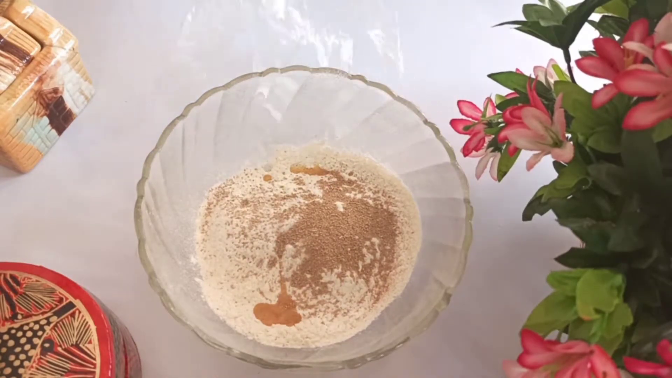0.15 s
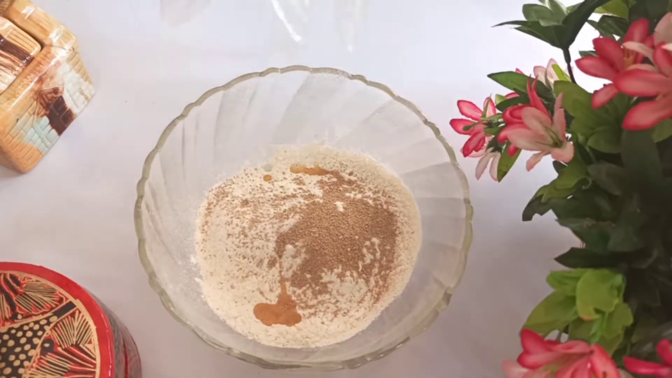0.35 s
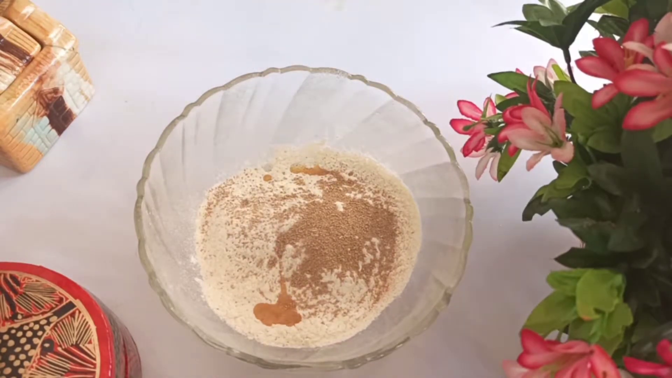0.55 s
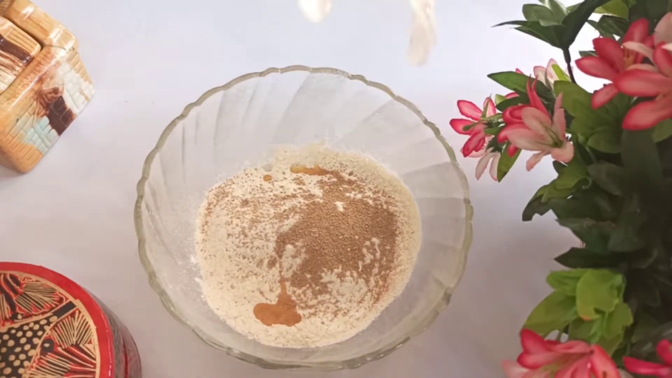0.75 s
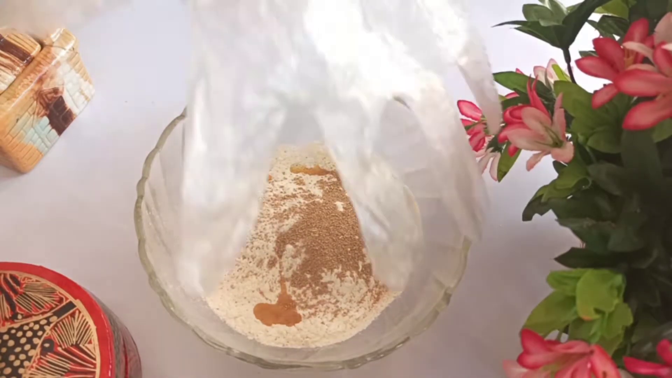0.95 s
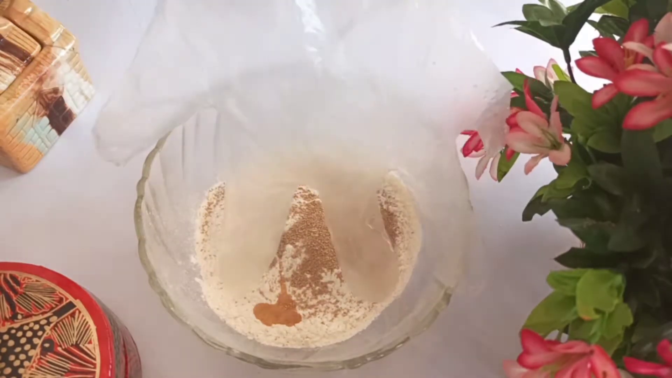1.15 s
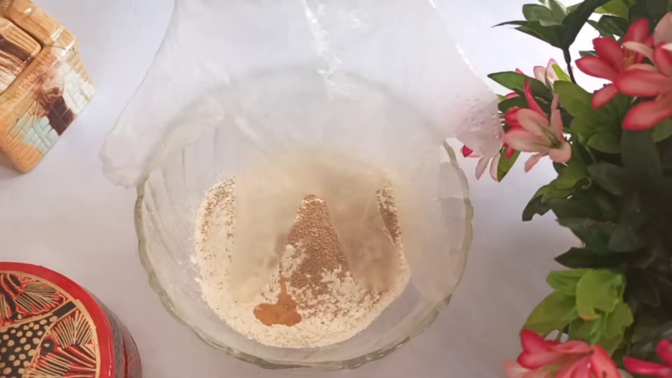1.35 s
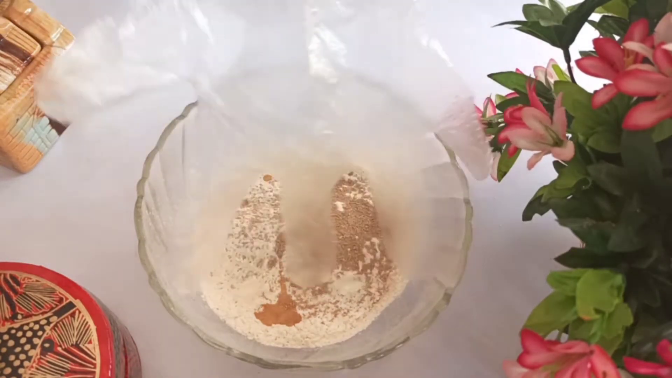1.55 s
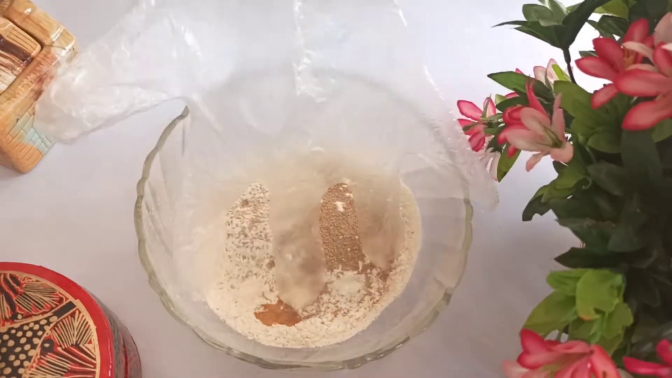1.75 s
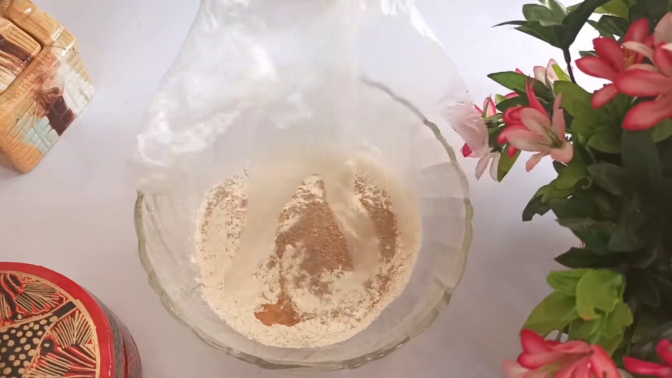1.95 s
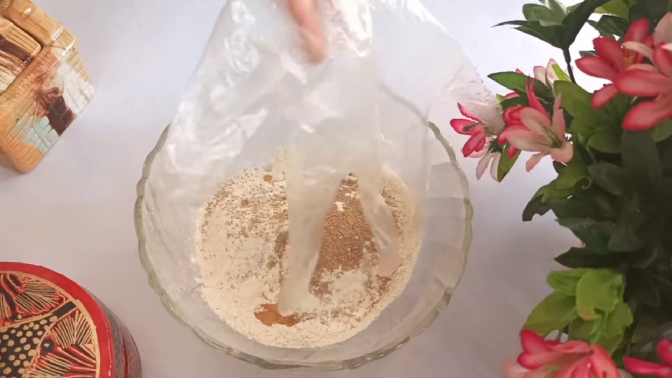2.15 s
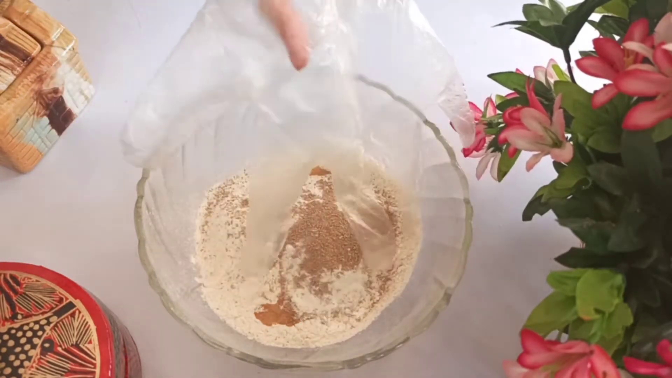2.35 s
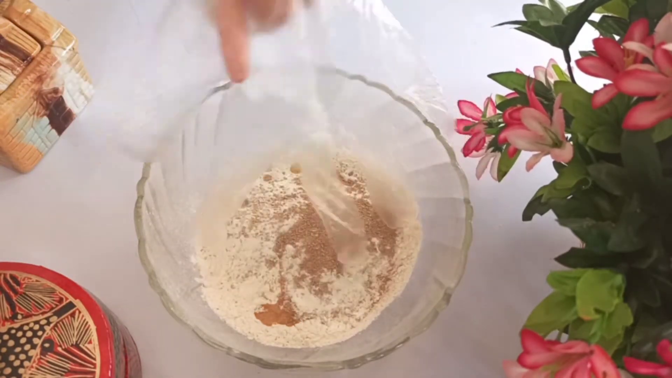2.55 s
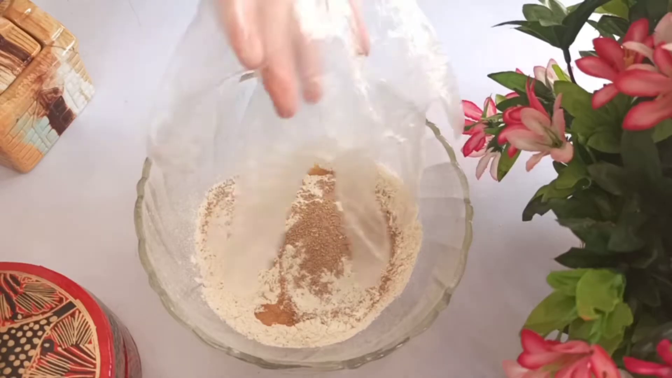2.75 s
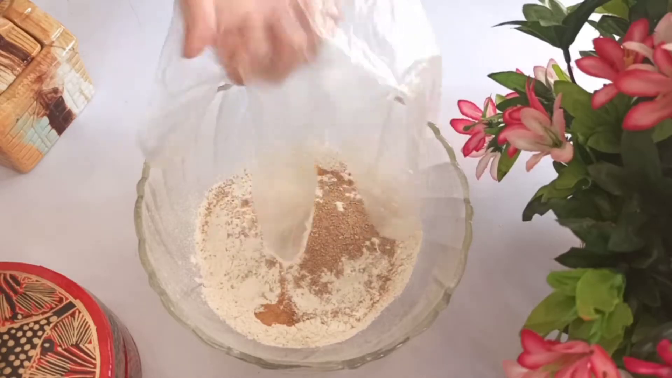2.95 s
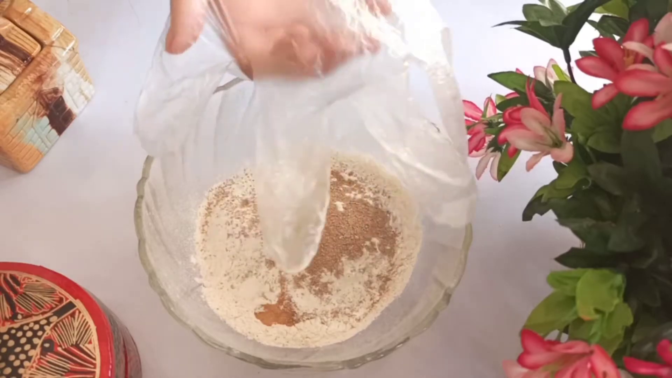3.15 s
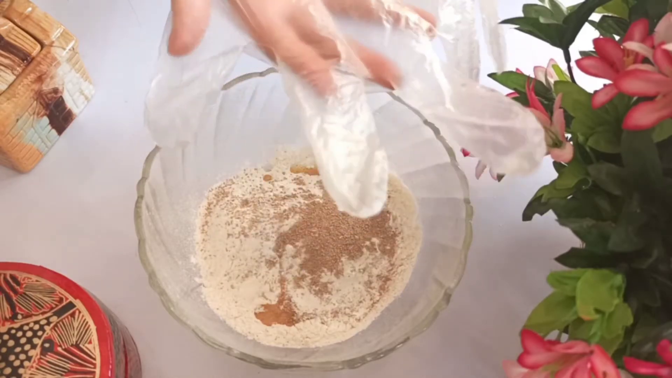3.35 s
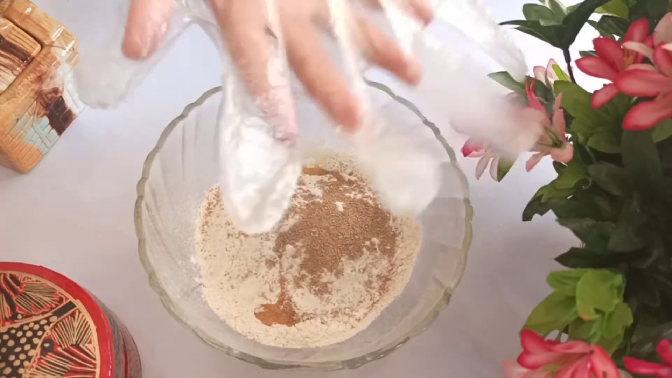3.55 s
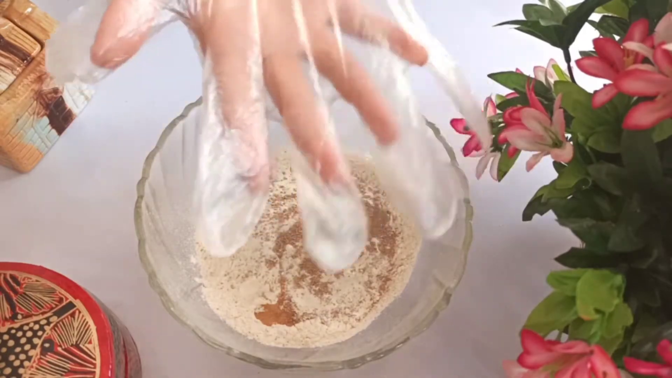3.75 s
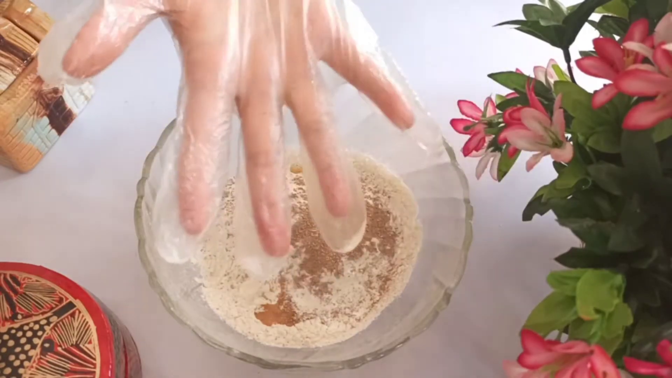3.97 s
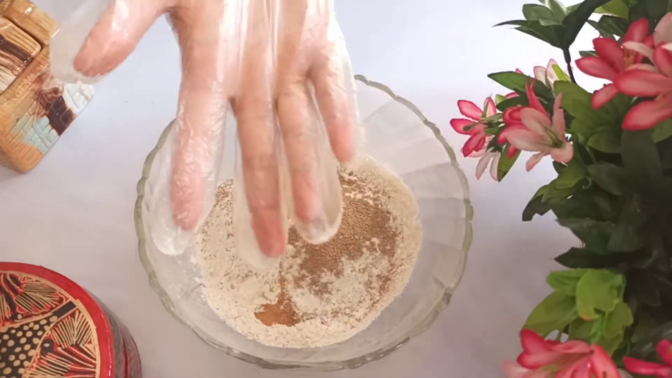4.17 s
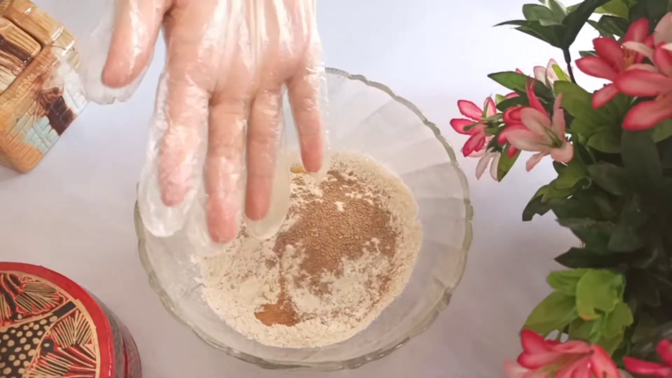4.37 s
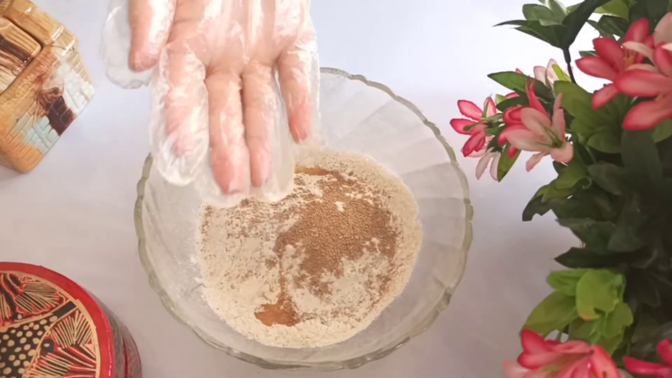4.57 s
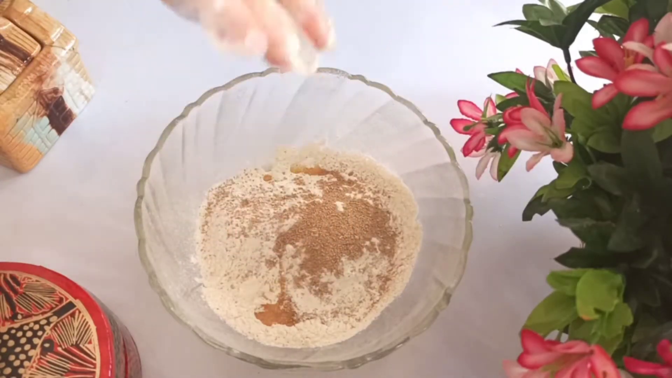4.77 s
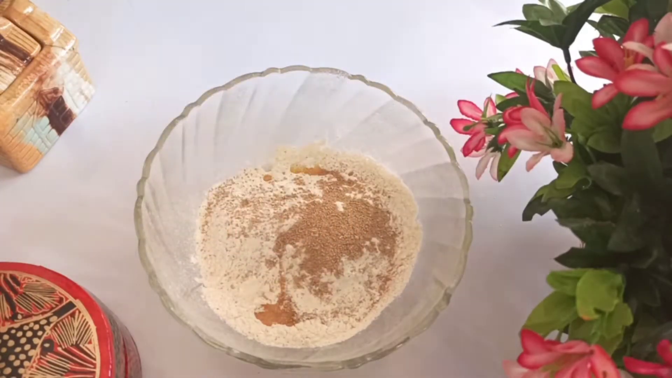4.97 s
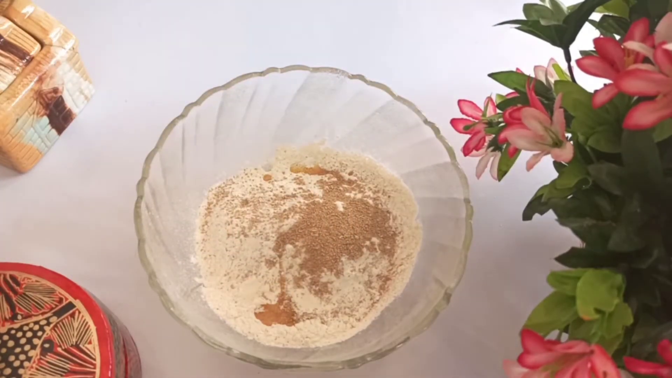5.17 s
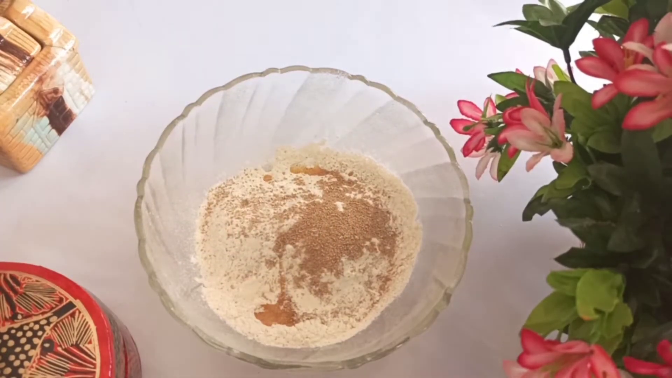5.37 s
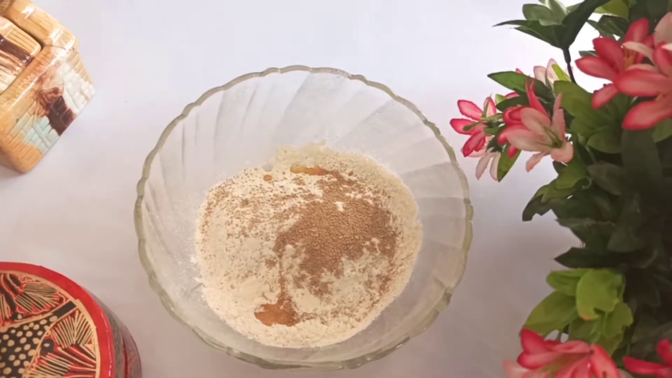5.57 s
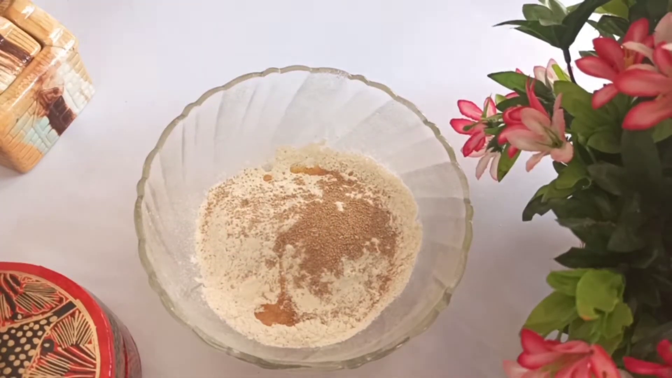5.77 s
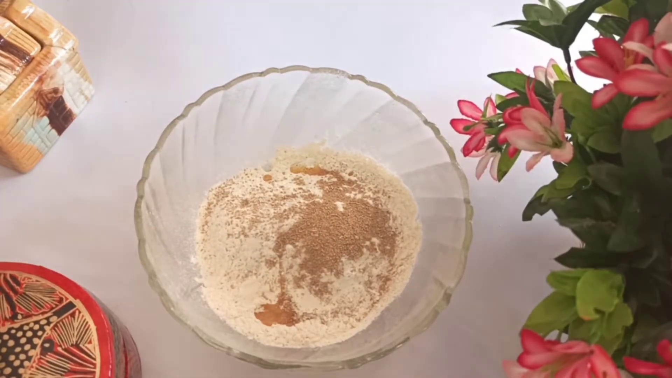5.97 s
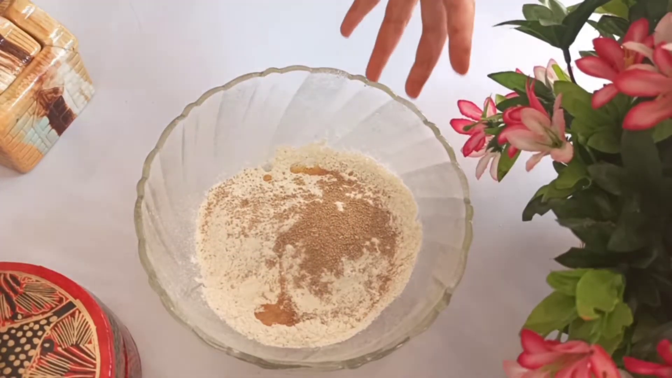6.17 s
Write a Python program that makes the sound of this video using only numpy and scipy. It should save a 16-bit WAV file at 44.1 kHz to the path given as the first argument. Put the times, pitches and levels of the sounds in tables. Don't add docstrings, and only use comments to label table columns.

```python
import sys
import numpy as np
from scipy import signal
from scipy.fft import rfft, irfft, next_fast_len
from scipy.io import wavfile
from scipy.ndimage import uniform_filter1d

SR = 44100
rng = np.random.default_rng(int(sys.argv[2]) if len(sys.argv) > 2 else 0)


def unload_audio(sound):
    columns = np.transpose(np.atleast_2d(sound))
    steps = np.round(np.clip(columns, -1, 1) * 32767)
    wavfile.write(sys.argv[1], SR, steps.astype(np.int16))


def ratio_of_db(decibels):
    return 10 ** (np.asarray(decibels, float) / 20)


N = 274302

# (frequency [Hz], level [dB])
FILM_COLOUR = [(45, -20.5), (90, -9.5), (230, -2.5), (500, -2.5), (850, -2), (1100, -3), (2000, -3.5),
               (3000, 1), (4500, 2), (16000, 1)]
# (frequency [Hz], level [dB])
STEPPED_TREBLE = [(4700, -0.5), (4800, -4), (6100, -3.5), (6200, 3.5), (7600, 5.5), (7750, 1.5), (8550, -1),
                  (8650, -5), (11050, -19.5), (11150, -58), (11520, -55), (11650, -3), (15450, -3),
                  (15600, -65)]
# (cut [s], end of the fading smear [s], return [s])
DROPOUT_TIMES = (5.1515, 5.173, 5.2145)
USUAL_EFFORT_DB = -47


def evened(x):
    return x / np.sqrt(np.mean(x ** 2) + 1e-20)


def read(points, hz):
    f, value = np.transpose(points)
    return np.interp(np.log(hz + 1), np.log(f + 1), value)


def coloured(x, points):
    size = next_fast_len(N + 4096)
    gain = ratio_of_db(read(points, np.fft.rfftfreq(size, 1 / SR)))
    return irfft(rfft(x, size) * gain, size)[..., :N]


def band(x, lo_hz, hi_hz):
    return signal.sosfilt(signal.butter(4, [lo_hz, hi_hz], "bandpass", fs=SR, output="sos"), x)


def wander(per_s):
    knots = rng.standard_normal(N // 64 + 2)
    slow = signal.lfilter([1], [1, -np.exp(-2 * np.pi * per_s * 64 / SR)], knots)
    return np.interp(np.arange(N) / 64, np.arange(len(slow)), evened(slow))


def swell(tugs, t):
    s, db, rise, fall = np.transpose(tugs)[:, :, None]
    late = t - s
    level_db = db - 10 * np.maximum(-late / abs(rise), late / abs(fall))
    return (ratio_of_db(level_db) ** 2).sum(0)


def handling(at):
    # (peak [s], effort [dB], swell per 10 dB [s],
    # sink per 10 dB [s])
    glove_tugs = [(0.015, -62, 2, 0.2), (0.507, -51, 0.36, 0.1), (0.64, -56, .05, 0.3),
                  (0.777, -52.5, .04, .1), (0.937, -53, .4, .018), (1.116, -59, 0.3, -0.2),
                  (1.309, -48.5, .024, 0.1), (1.41, -51, 0.25, 0.23), (1.523, -44, 0.0458, .095),
                  (1.615, -48.5, 0.06, .03), (1.711, -56, 0, .03), (1.8, -51, .03, 0.12),
                  (1.895, -43, 0.07, 0.09), (2.058, -40, 0.11, .09), (2.2, -45, .29, .028),
                  (2.399, -42.9, 0.06, 0.081), (2.623, -35, 0.13, 0.07), (2.767, -43, 0.087, 0.31),
               (2.835, -43.5, 0.033, 0.28), (3.006, -41.0, 0.23, 0.022), (3.06, -50, 0.01, 0.29),
               (3.239, -46, 0.028, 0.12), (3.476, -41, 0.2, 0.032), (3.585, -38.5, 0.084, 0.098),
               (3.766, -44, 0.16, 0.127), (3.899, -42, 0.052, 0.051), (3.989, -43, 0.188, 0.064),
               (4.189, -40.5, 0.036, 0.065), (4.312, -50, 0.13, 0.042), (4.383, -42.9, 0.01, 0.1),
               (4.562, -44, 0.276, 0.097), (4.655, -39.5, 0.036, 0.092), (4.785, -49.5, 0.49, 0.0064),
               (4.882, -46, 0.041, 0.11), (5.085, -51, 0.051, 0.099), (5.142, -51.5, 0.036, 0.019)]
    next_shot = [
        (5.244, -51.5, 0.42, .003),
        (5.25, -67, .003, .015),
        (6.07, -72.5, .05, 0.054),
        (6.11, -69, 0.032, .05),
        (6.206, -56, 0.075, .03),
    ]
    # (time [s], slack of the film [dB], turn of the cuff toward the phone [dB])
    fit = [(0.0, 3.5, -1), (0.82, -.5, -2.5), (1.0, 2, -2), (1.25, 1, -1.5), (1.4, 1, 0), (2.4, -.5, 0),
           (2.9, 0.5, -1), (3.12, 4, -1), (3.27, 3.5, -0.5), (3.4, 0.5, 0), (3.6, -2, -1.5),
           (4.05, -1, -1.5), (4.3, -3, 0), (5.15, -4, -1.5), (6.1, -1, -1.5)]
    t = np.arange(0, N + 64, 64) / SR
    power = np.where(t < DROPOUT_TIMES[1], swell(glove_tugs, t), swell(next_shot, t))
    effort = 10 * np.log10(power + 1e-12)
    s, slack, turn = np.transpose(fit)
    slack = np.interp(t, s, slack)
    hard = np.clip(effort - USUAL_EFFORT_DB, -15, 15)
    flap = 1.18 * slack - 0.041 * hard
    crackle = 0.86 * slack - 0.09 * hard
    fizz = np.interp(t, s, turn) - 0.088 * hard
    return [np.interp(at, t, row) for row in (effort, flap, crackle, fizz)]


def buckles(per_s=2500, spread_db=3.0, clump_db=1.26, lag=6.0, lag_spread=3.5, longest_ms=3.2):
    size = ratio_of_db(spread_db * np.minimum(rng.exponential(1, N), 3.5) + clump_db * wander(60))
    size *= rng.random(N) < per_s / SR
    spot, out = rng.integers(0, 10, N), np.zeros((2, N))
    for k, ms in enumerate(np.geomspace(.35, longest_ms, 10)):
        keep = np.exp(-3000 / (ms * SR))
        power = signal.lfilter([(1 - keep) ** 2], [1, -2 * keep, keep ** 2], (size * (spot == k)) ** 2)
        crack = np.sqrt(power) * rng.standard_normal(N)
        lag_samples = round(lag + lag_spread * np.sin(2.4 * k))
        out += [crack, np.roll(crack, lag_samples)]
    return out


def kitchen(x, t60=0.071):
    t = np.arange(SR // 6) / SR
    tails = rng.standard_normal((4, 2, len(t))) * ratio_of_db(-60 * t / t60) * (t > .001)
    turn = np.arange(N) / SR * 3
    distance = [np.minimum(abs((turn - k + 2) % 4 - 2), 1) for k in range(4)]
    feeds = np.cos(np.pi / 2 * np.array(distance))
    tails = tails / np.linalg.norm(tails[0, 0])
    wet = signal.oaconvolve((feeds * x.mean(0))[:, None], tails, axes=2)
    return wet.sum(0)[:, :N]


def patchy(x, spread_db=1.0):
    hz, t, z = signal.stft(x, SR, nperseg=512)
    patches = uniform_filter1d(uniform_filter1d(rng.standard_normal(z.shape[1:]), 6, 0), 7, 1)
    return signal.istft(z * ratio_of_db(spread_db * evened(patches)), SR, nperseg=512)[1][:, :N]


def pocket(x, width=220):
    # (time [s], frequency [Hz])
    pitch = [(0.0, 585), (0.19, 494), (2.01, 707), (3.1, 690), (3.24, 841), (3.47, 590), (3.89, 773),
             (4.79, 613), (5.15, 682)]
    s, hz = np.transpose(pitch)
    turn = np.exp(2j * np.pi * np.cumsum(np.interp(np.arange(N) / SR, s, hz)) / SR)
    r = np.exp(-np.pi * width / SR)
    return 2 * (turn * signal.lfilter([1 - r], [1, -r], x / turn)).real


def rustle():
    near = evened(buckles())
    slide = rng.standard_normal((2, N)) * ratio_of_db(0.87 * wander(23))
    film = near + ratio_of_db(-5.5) * kitchen(near, 0.053) + ratio_of_db(-1) * slide
    film = coloured(patchy(film), FILM_COLOUR)
    film /= np.std(band(coloured(film, STEPPED_TREBLE), 3870, 7650))
    flap = coloured(film, [(1300, 0), (1900, -30)])
    ring = ratio_of_db(-10.5 + 4.6 * wander(3.5)) * pocket(flap)
    below = coloured(film, [(4200, 0), (5200, -30)])
    fizz = coloured(film, [(9000, -60), (11000, 0)])
    effort_db, flap_db, crackle_db, fizz_db = handling(np.arange(N) / SR)
    layers = film - below - fizz
    layers += ratio_of_db(flap_db - 0.3) * (flap + ring)
    layers += ratio_of_db(crackle_db + 1.0) * (below - flap)
    layers += ratio_of_db(fizz_db + 0.23) * fizz
    return ratio_of_db(effort_db) * layers


def hum():
    # (frequency [Hz], level per Hz [dB])
    room_colour = [(25, -32.5), (60, -24), (78, -14), (96, -8.5), (155, -12), (300, -17.5), (500, -20),
                   (1170, -30), (2500, -34.5), (4500, -33), (6500, -39.5), (8000, -41.5), (12000, -36),
                   (16000, -35.5)]
    noise = rng.standard_normal((3, N))
    room = coloured(noise[:2] + 0.36 * noise[2], room_colour)
    return ratio_of_db(-64 + 0.41 * wander(2.6)) * evened(room)


def small_snaps(count=130):
    when, size, long, dull = rng.random((count, 4)).T
    when = when * DROPOUT_TIMES[0]
    hard = handling(when)[0] - USUAL_EFFORT_DB
    db = USUAL_EFFORT_DB + .7 * hard + 6.5 + 1.5 * (2 * size - 1)
    length_ms = 0.63 * 2 ** (3 * long ** 2 - .6)
    fullness_db = 14 * (dull - .5)
    return np.transpose([when, db, length_ms, fullness_db]).tolist()


def snaps():
    # (time [s], peak [dB], length [ms], fullness at 2-5 kHz [dB])
    large = [(0.1613, -43, .8, 9), (0.1949, -47, 2.1, 6), (0.2135, -43, 1.4, 0), (0.2622, -32, .9, 4),
             (0.7788, -37, 1.1, -8), (1.3096, -35, .7, 4), (1.6073, -34, 1.1, 0), (2.0484, -27, 1.3, -6),
             (2.0899, -28, 1.3, -12), (2.1554, -31, 0.55, -6), (2.1924, -27, 0.65, -9),
             (2.3815, -34, .8, -1), (2.8459, -29.5, 1.1, -10), (2.9336, -27, 0.7, -5.5),
             (2.9531, -25.5, 0.55, -5), (3.0593, -29.5, .9, -8), (3.2817, -39.5, 1.4, -13),
             (3.4379, -28, .8, 2), (3.4667, -31, 1.4, 2), (3.4946, -33, 1.6, -7), (3.9876, -32.5, 0.63, 2),
             (4.1658, -29, .9, -6), (4.1933, -27, 0.55, -5), (4.2715, -33, 0.82, 5),
             (4.3035, -33.5, 1.2, -6), (1.8042, -37, 1.4, 0), (4.3875, -30.5, 0.87, -12),
             (4.854, -40, 0.56, -6), (6.0799, -50.5, 1.7, 2), (0.4001, -46, 2, 12)]
    late = [(5.149, -37.5, 0.65, -3), (5.2304, -43, 1.9, -11), (6.0624, -58, .7, -6), (6.0976, -55, 2, -3),
            (6.1067, -54, 2, -3), (6.1305, -54, 2.5, 6), (6.1525, -52, 2.5, 10), (6.163, -54, 2.5, 3),
            (6.184, -54, 3, 10), (6.2, -53, 3, 11), (6.2123, -52, 2, 6)]
    out, t = np.zeros((2, N + 512)), np.arange(512) / SR
    rows = large + late + small_snaps()
    bursts = rng.standard_normal((len(rows), 3, 512))
    body = signal.butter(2, [2400, 5000], "bandpass", fs=SR, output="sos")
    for (s, db, ms, fullness_db), (shared, left, right) in zip(rows, bursts):
        age = 1000 * t / max(ms, .3)
        both_ports = np.array([shared + 0.54 * left, np.roll(shared, 6) + 0.19 * right])
        burst = age * np.exp(-2 * age) * both_ports
        burst *= np.sqrt(ms / (burst ** 2).sum(1, keepdims=True))
        burst += (ratio_of_db(fullness_db) - 1) * signal.sosfiltfilt(body, burst)
        at = round(s * SR)
        out[:, at:at + 512] += ratio_of_db(db + 12.0) * burst
    film = coloured(out[:, :N], FILM_COLOUR)
    return coloured(film, [(700, -1.5), (2500, -1.0), (9000, 3.5), (12000, -4.0)])


def puffs(width_s=.035):
    # (time [s], level [dB])
    rushes = [(0.29, -72), (1.31, -68), (1.53, -62.5), (1.8, -66), (2.62, -58.5), (2.97, -65), (3.25, -67),
              (3.58, -61.5), (4.2, -61), (4.66, -60.5)]
    t = np.arange(0, N + 64, 64) / SR
    shape = sum(ratio_of_db(db) * np.exp(-((t - s) / width_s) ** 2) for s, db in rushes)
    air = evened(band(rng.standard_normal(N), 90, 426))
    return np.interp(np.arange(N) / SR, t, shape) * air


def chirps():
    # (start [s], end [s], start pitch [Hz], end pitch [Hz], level [dB])
    notes = [
        (5.8, 5.875, 4390, 4050, -70.5),
        (5.847, 5.947, 3310, 2910, -72),
    ]
    out = np.zeros((2, N))
    for start, end, from_hz, to_hz, db in notes:
        count = round((end - start) * SR)
        blur = uniform_filter1d(rng.standard_normal((2, 2, 6000)), 35)[..., :count]
        turn = np.exp(2j * np.pi * np.cumsum(np.linspace(from_hz, to_hz, count)) / SR)
        breath = evened(((blur[0] + 1j * blur[1]) * turn).real)
        note = breath * signal.windows.tukey(count, .6)
        out[:, round(start * SR):][:, :count] += ratio_of_db(db) * note
    return out


def ports(x):
    # (frequency [Hz], left minus right [dB])
    balance = [(60, -2.5), (130, 1), (290, 0), (640, 1), (1410, 1), (3100, 0.5), (6820, 3), (15000, -1)]
    # (frequency [Hz], side level [dB])
    width = [(100, -8), (300, -12), (700, -6), (1500, -0.5), (16000, 0)]
    mid, side = x.mean(0), coloured((x[0] - x[1]) / 2, width)
    half = np.array(balance) * [1, .5]
    return np.array([coloured(mid + side, half), coloured(mid - side, half * [1, -1])])


def scene():
    glove = rustle() + snaps() + puffs()
    near = ports(glove + ratio_of_db(-10.0) * kitchen(glove))
    return near + hum() * ratio_of_db([[.9], [-.9]]) + chirps()


def thinned_blocks(x, hole_db=-75):
    # (frequency [Hz], share [0-1])
    dropped = [(1500, 0), (2000, .03), (3200, .07), (3800, .008), (4700, .005), (4950, .1), (5600, .015),
               (6100, 0), (8530, 0), (8600, .55), (9000, .92), (11200, .94), (11300, 0)]
    hz, t, z = signal.stft(x, SR, nperseg=1024, noverlap=768)
    effort_db, _, crackle_db, _ = handling(t)
    loud, dullness = effort_db > -62, ratio_of_db(-2.5 * crackle_db)
    share, step = read(dropped, hz)[:, None], np.arange(len(t)) + 1
    gap = share > .3
    block = (14 * np.log(hz + 900)).astype(int)
    wide = rng.random((block[-1] + 1, len(t)))[block][:, step // 4]
    thin = rng.random((len(hz), len(t)))[np.arange(len(hz)) // 4][:, step // 8]
    wide_holes = (wide < share * dullness) & (hz[:, None] < 4500)
    thin_holes = thin < np.where(loud, 1.2, .5) * share * dullness
    holes = (wide_holes | thin_holes) & (loud | (hz[:, None] > 4700))
    empty = np.where(loud, (wide < share) | (thin < .35), thin < .5)
    kept = np.where(np.where(gap, empty, holes), ratio_of_db(hole_db), 1)
    return signal.istft(z * kept, SR, nperseg=1024, noverlap=768)[1][:, :N]


def low_pass(x):
    return signal.sosfilt(signal.butter(12, 16400, fs=SR, output="sos"), x)


def record(dry):
    t, (cut, fade, back) = np.arange(N) / SR, DROPOUT_TIMES
    smear = ratio_of_db(-48 - 1100 * np.clip(t - cut, 0, 1)) * (t < fade)
    lead_in = ratio_of_db(-29 - 3000 * np.clip(back - t, 0, 1)) * (t > back - .005)
    gate = np.where((t < cut) | (t > back), 1, smear + lead_in)
    return low_pass(thinned_blocks(coloured(dry, STEPPED_TREBLE)) * gate)


dry = scene()
out = record(dry)
unload_audio(out)
```